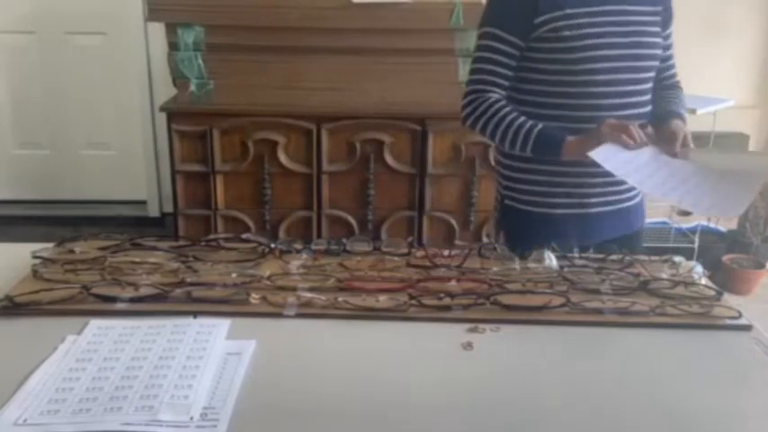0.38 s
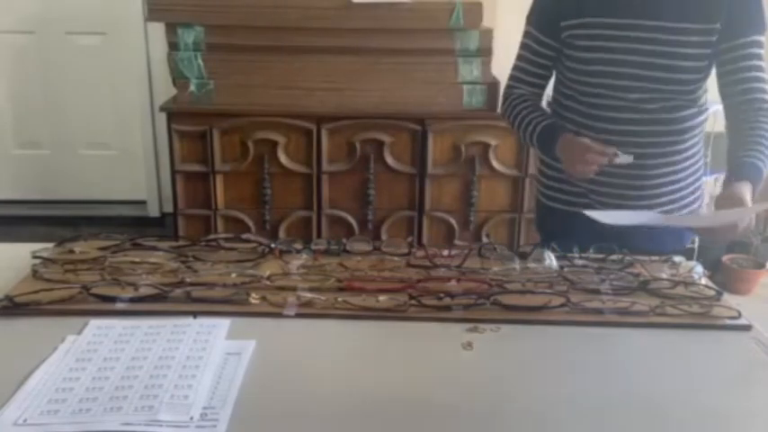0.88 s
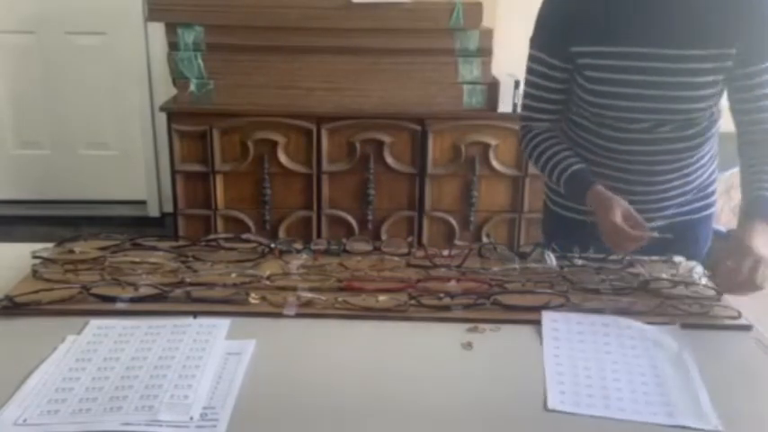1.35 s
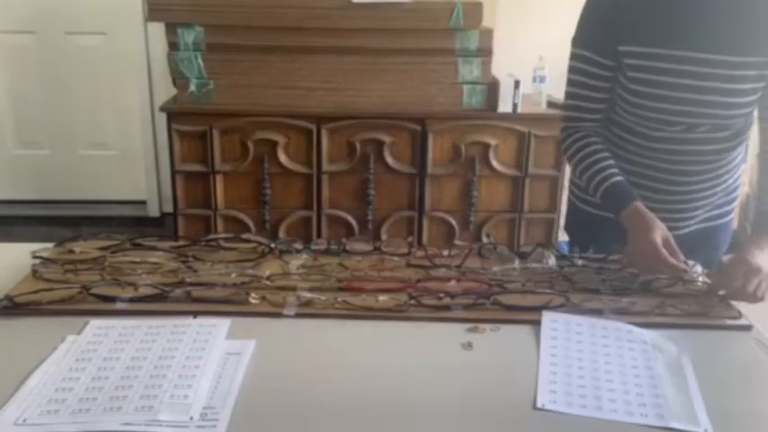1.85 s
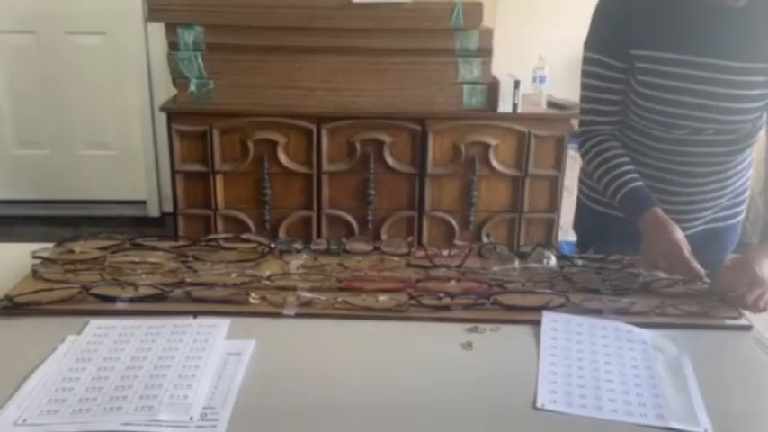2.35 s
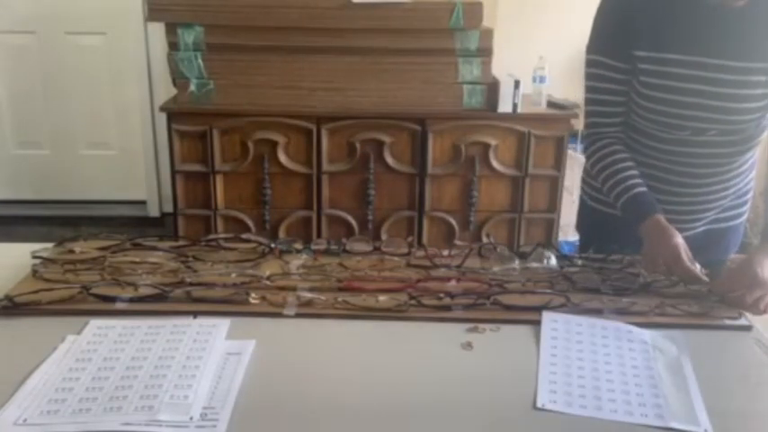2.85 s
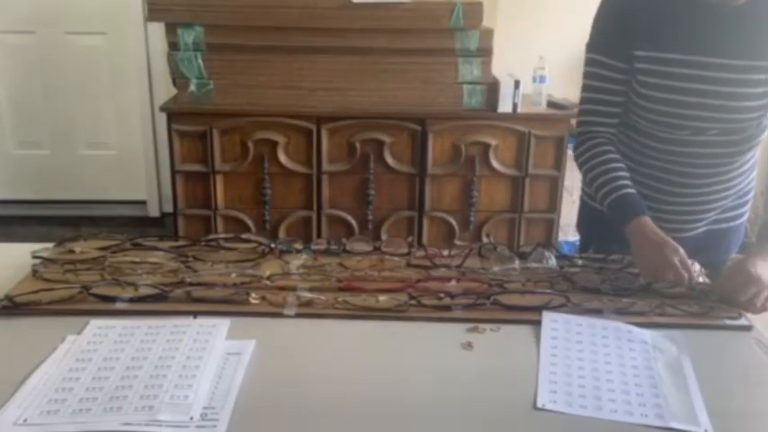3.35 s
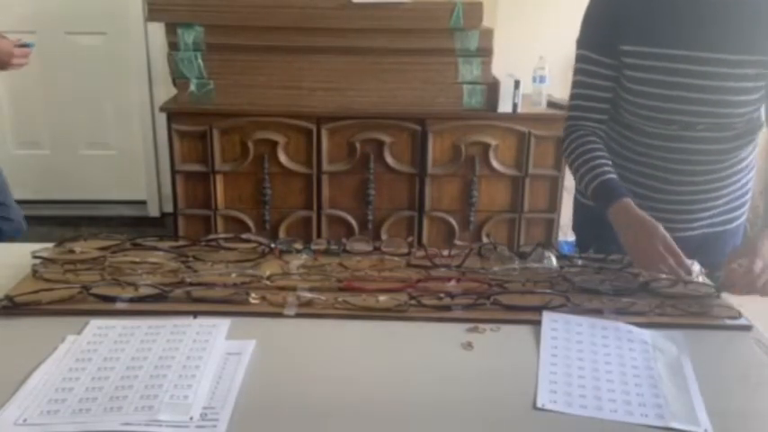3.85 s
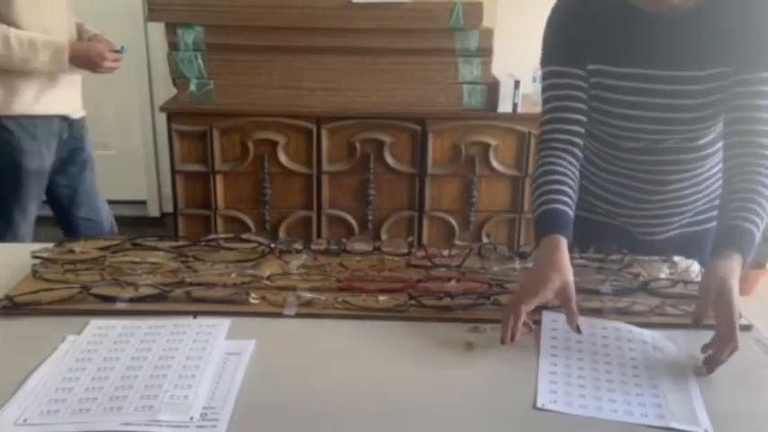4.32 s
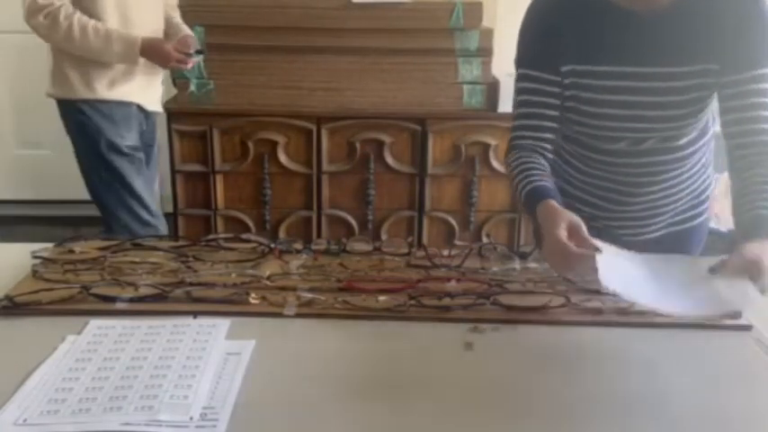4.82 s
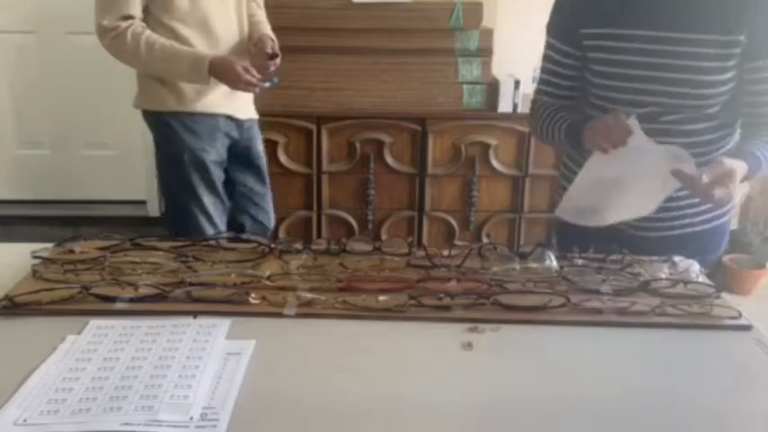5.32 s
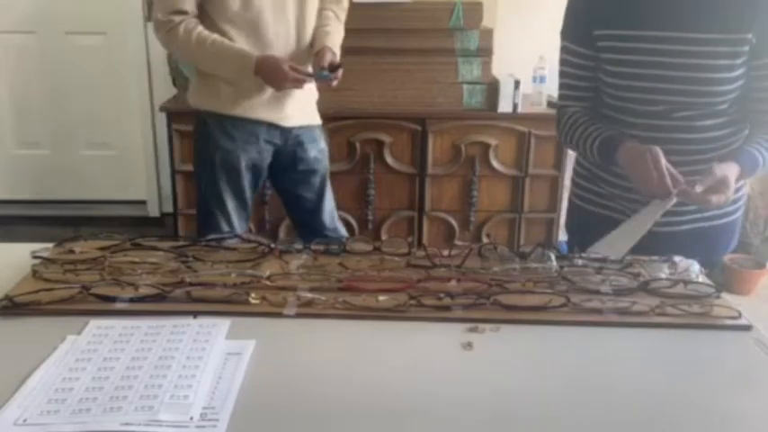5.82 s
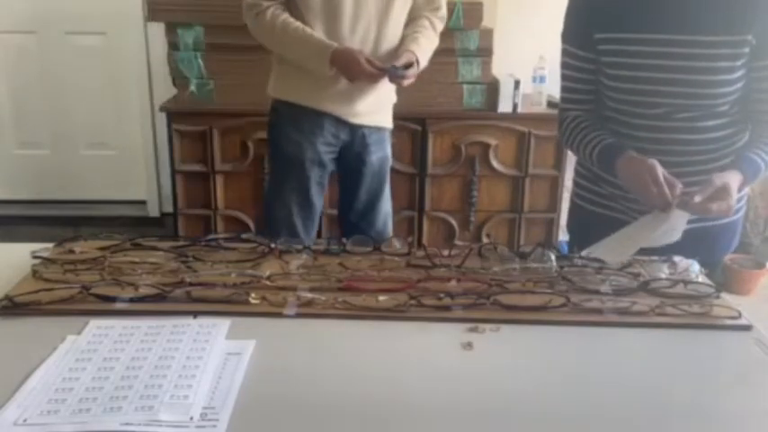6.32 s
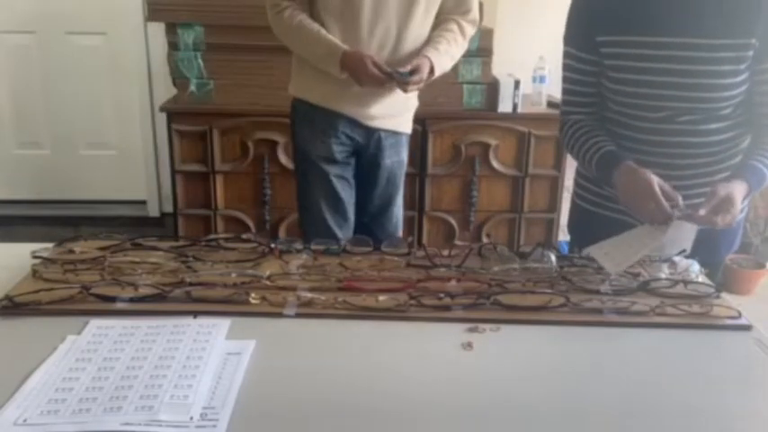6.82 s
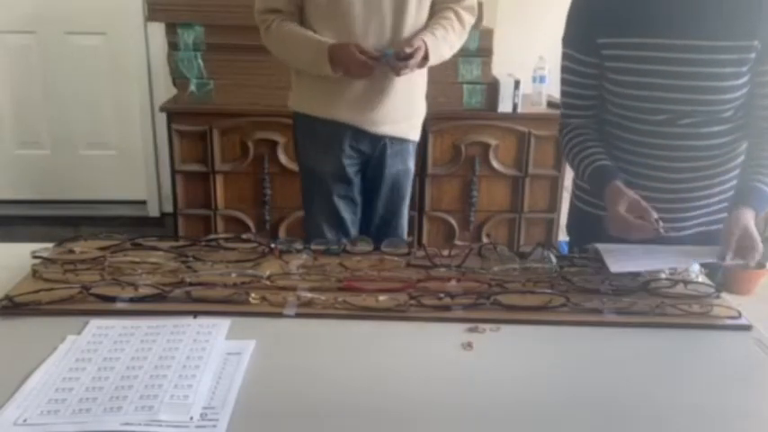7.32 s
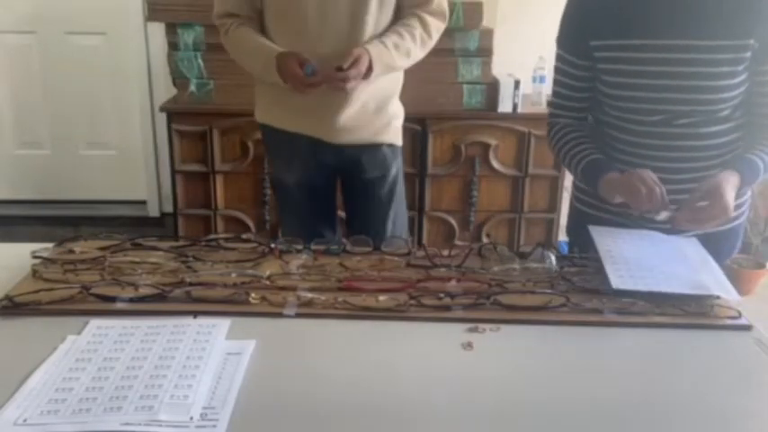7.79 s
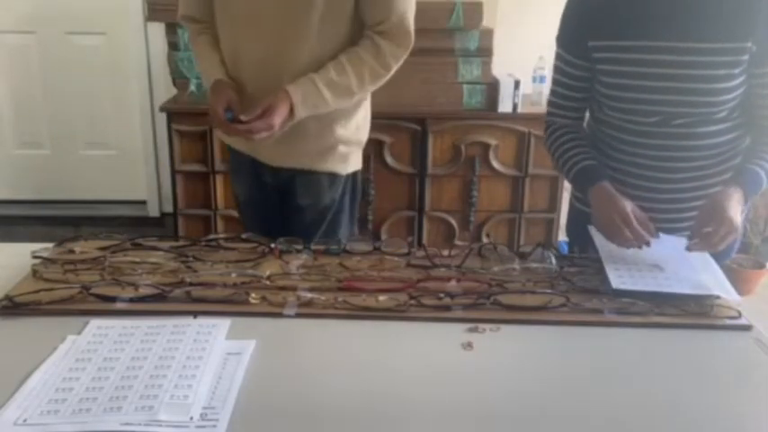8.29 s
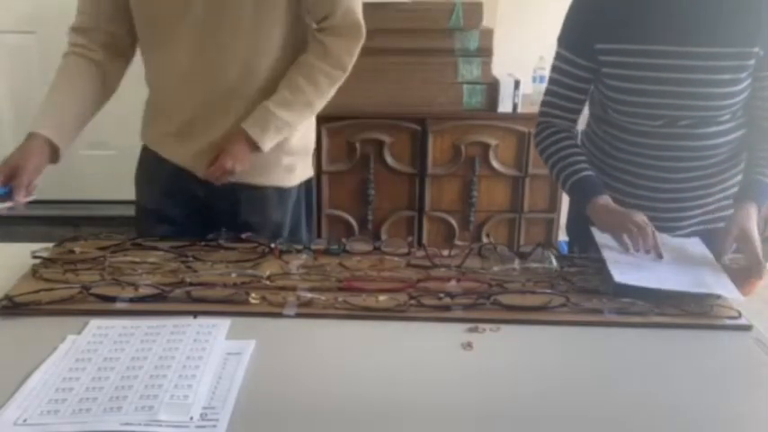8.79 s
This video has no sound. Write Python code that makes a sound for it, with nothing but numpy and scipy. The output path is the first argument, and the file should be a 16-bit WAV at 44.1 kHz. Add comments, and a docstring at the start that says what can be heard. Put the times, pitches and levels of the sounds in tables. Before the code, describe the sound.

A quiet furnished room with faint ventilation rumble and low mains hum, heard by a phone near a table. From 0 to 1.3 s paper rustles and slides, with light plastic taps, soft knocks and tiny crease pops. A very short, rough squeak of rubbing comes at about 1.35 s. From 1.5 to 3.8 s it is sparser: small ticks, a crisp click near 2.2, faint paper crackles. A bright sliding swish at 4.1 leads into the busiest moment, 4.25 to 4.7 s: hard clicks, table thuds, a brief loose-frame rattle and loud crinkling paper. Another paper crackle comes at 5.3. Distinct dry plastic clicks follow at about 5.7, 6.0, 6.3, 6.6 and 6.9, with gentle rustling between. From 7 to 8.2 s there is soft paper crackle and minor taps, then the sharpest snap at 8.5, a small tap, and fading rustle to about 8.9.

```python
"""Plastic spectacle frames tap and snap on a long table: each tap is a short burst shaped by damped modes.
Paper sheets rustle and slide by stick-slip friction and pop as creases buckle; knocks excite the table top.
A finger's rubbing gives a squeak of harmonics and jolts ring a loose frame's modes; a furnished room reflects.
Ventilation rumble, mains hum and a faint whine lie underneath as shaped noise and tones; a phone listens."""
import sys
import numpy as np
from scipy import signal
from scipy.fft import rfft, irfft
from scipy.io import wavfile
from scipy.ndimage import uniform_filter1d

SR = 44100
rng = np.random.default_rng(int(sys.argv[2]) if len(sys.argv) > 2 else 0)


def bounce(signal):
    """Save signal as a 16-bit WAV file at the path given by the first command-line argument."""
    frames = np.transpose(np.atleast_2d(signal))
    limited = np.clip(frames, -1, 1)
    pcm = np.round(limited * 32767).astype(np.int16)
    wavfile.write(sys.argv[1], SR, pcm)


def ratio_of_db(decibels):
    """Turn decibels (scalar or array-like) into linear amplitude factors; 0 dB maps to 1."""
    return 10 ** (np.asarray(decibels, float) / 20)


N = 393372
T = np.arange(N) / SR
TAP_T60 = .009  # s, nominal 60 dB decay of a tap's burst

# Table levels belong to the source, ahead of its fluctuation, the room and the stereo balance.
# hands and frames knock the table top: t/s, thud level/dB, rumble level/dB, time to die by 20 dB/s
# (a time below 5 ms counts as 5 ms)
KNOCKS = [(0.0, -80, -50.5, 0.56), (.192, -44.5, -55.5, 2.8), (.4788, -50, -51, 0.3),
          (.6547, -60, -58, 0.6), (.772, -53, -52.5, 0.6), (1.066, -47, -50.5, 0.17),
          (1.21, -67, -46, -0.1), (1.4925, -59, -52, 0.05), (1.56, -75, -52, 0.2),
          (1.89, -75.5, -61.5, 1.3), (2.25, -70, -62, 0.6), (2.575, -72, -51.5, 0.13),
          (2.9345, -57.5, -58.5, 0.7), (3.27, -70, -60, 1.1), (3.8401, -47, -40.5, 0.0651),
          (4.2675, -35.5, -30.5, 0.3), (4.3135, -44, -37, 0.23), (4.342, -55, -50, 0.1),
          (4.3801, -38.5, -37, .1), (4.41, -43, -36.5, 0.11), (4.4682, -44, -45, 0.06),
          (4.52, -45, -40, 0.18), (4.594, -45, -55, 0.1), (4.94, -55.5, -61, 4), (5.015, -60, -49.5, 0.16),
          (5.1114, -52, -62, 3), (5.2555, -46, -45, .08), (5.3105, -41, -46, 0.2), (5.485, -65, -44, -0.15),
          (5.6183, -54, -54.5, 0.7), (5.698, -43.5, -61.5, 1), (5.7884, -50, -67, .2),
          (5.9666, -42.5, -57, .2), (6.1178, -60, -68, 7), (6.27, -60, -56, 0.1), (6.323, -37, -55.5, .2),
          (6.556, -49.5, -55, 0.1), (6.6204, -46, -60.5, -1.5), (6.768, -59.5, -64, 2),
          (6.862, -41, -68.5, -0.3), (7.2566, -51, -57.5, .3), (7.4808, -48, -52.5, 0.2),
          (7.64, -65, -50, -0.6), (7.8412, -57.5, -51, 0.03), (8.19, -57, -57, 0.27),
          (8.4829, -65, -54, 0.16), (8.5891, -52, -49, 0.1), (8.86, -75, -63, 0.7)]


def on_log(table, hz):
    """Interpolation on a logarithmic frequency axis, the natural scale of pitch."""
    f, v = np.transpose(table)
    return np.interp(np.log(np.maximum(hz, 1)), np.log(f), v)


def level(x, db):
    """The rms value measures mean power: scale the signal to it."""
    return x * ratio_of_db(db) / np.sqrt(np.mean(x ** 2))


def colour(x, gain):
    """Linear filtering multiplies the spectrum by a gain that is a function of frequency."""
    size = x.shape[-1]
    return irfft(rfft(x) * gain(np.arange(size // 2 + 1) * SR / size), size)


def spread(mid, side):
    """Diffuse-field coherence: two close microphones hear partly alike signals, set by mid and side power."""
    # left-right likeness: f/Hz, correlation (0-1)
    likeness = [(60, 0.97), (130, 0.95), (250, 0.84), (450, 0.69), (800, 0.2), (1300, 0.28), (2400, 0.8),
                (4400, 0.45), (8000, 0.59), (15000, 0)]
    like = lambda hz: np.clip(on_log(likeness, hz), 0, 1)
    mid = colour(mid, lambda hz: np.sqrt((1 + like(hz)) / 2))
    side = colour(side, lambda hz: np.sqrt((1 - like(hz)) / 2))
    return np.array([mid + side, mid - side])


def walk(rate):
    """Band-limited random fluctuation: levels held 1 / rate s, slewed twice, with a spread near 1."""
    hold = int(SR / rate)
    steps = np.repeat(rng.standard_normal(N // hold + 1), hold)
    return 1.3 * uniform_filter1d(uniform_filter1d(steps, hold), hold)[:N]


def ring(hz, width, db):
    """Narrow-band noise: one resonance turns noise into a wavering tone, halved in amplitude at hz +- width."""
    return level(colour(rng.standard_normal(N), lambda f: 1 / (1 + ((f - hz) / width) ** 2)), db)


def swell(s, rise, fall):
    """Exponential growth and decay: power changes evenly in dB, by 20 dB in each given time (at least 5 ms)."""
    distance = np.where(T < s, (s - T) / max(rise, .005), (T - s) / max(fall, .005))
    return ratio_of_db(np.maximum(-40 * distance, -300))


def crackle(rate, scatter_db, hiss_db, smear_s):
    """Stick-slip: fibres slip in small uneven jerks, each smeared by a short tail, over a smooth hiss."""
    sizes = ratio_of_db(scatter_db * np.minimum(rng.exponential(size=N), 3.5))
    jerks = (rng.random(N) < rate / SR) * sizes
    power = signal.lfilter([1], [1, -np.exp(-1 / (smear_s * SR))], jerks ** 2)
    envelope = np.sqrt(power / power.mean() + ratio_of_db(2 * hiss_db))
    return spread(*envelope * rng.standard_normal((2, N)))


def crack(t60, chance):
    """High modal overlap: dense damped modes merge into a dying burst, a little different at each port."""
    # direct sound at the two microphone ports: f/Hz, left minus right level/dB
    port_db = [(60, 2), (1300, -5), (2400, 0), (4400, 5), (8100, 2), (15000, -8)]
    # f/Hz, phase by which left leads/rad
    port_rad = [(0, -1), (1460, 0.48), (3190, -0.4), (6290, 1.5), (7490, 2.5), (8700, -0.85), (9730, -2),
                (10900, -5.5), (11400, -5.5), (12700, 5), (13400, -11), (14100, -12), (14800, -8.5),
                (16700, -18)]
    t = T[:chance.shape[1]]
    envelope = (1 - np.exp(-t / 0.000433)) * np.exp(-np.log(1000) * t / t60)
    burst = (chance[0] + 0.418 * chance[1:]) * envelope  # a shared part and one of each port
    # partly flatten the chance spectrum
    even = colour(burst, lambda f: np.abs(rfft(burst.mean(axis=0)) + 1e-9) ** -0.62)
    port = lambda f: ratio_of_db(on_log(port_db, f) / 2) * np.exp(.5j * np.interp(f, *np.transpose(port_rad)))
    return np.array([colour(even[0], port), colour(even[1], lambda f: 1 / port(f))])


def register(source, shape, db):
    """Spectral weighting: one register of a blow, at an rms level over its first 10 ms."""
    x = colour(source, lambda f: ratio_of_db(on_log(shape, f)))
    return x * ratio_of_db(db) / np.sqrt(np.mean(x[:, :440] ** 2))


def strike(out, s, blow):
    """Superposition: lay one blow into the output, its filter pre-ring faded in."""
    lead = 256  # samples
    blow = np.roll(blow, lead, axis=1) * np.clip(np.arange(4096) / lead, 0, 1) ** 4
    start = int(s * SR)
    return np.pad(blow, ((0, 0), (start, N - start)))[:, lead:lead + N] + out


def background():
    """Steady sources: shaped ventilation noise, narrow-band hum and a thin sinusoidal whine that comes and goes."""
    # ventilation spectrum: f/Hz, relative level/dB
    air_shape = [(15, -36), (25, -6), (80, 7.5), (226, -7), (445, -15), (1030, -24), (2330, -30.5),
                 (4240, -43.5), (8600, -36), (9330, -58), (10100, -52), (11300, -62), (13600, -60),
                 (15200, -48), (16500, -63)]
    # mains hum: f/Hz, half-amplitude offset/Hz, level/dB
    hum_lines = [(60.1, 7.6, -59.5)]
    # second hum line wavers, and swells as the table is bumped near 4.3 s: t/s, level/dB
    buzz_levels = [(0, -65.5), (4, -65.5), (4.3, -63), (4.9, -73), (5.9, -57.5), (6.3, -73.5), (7, -57),
                   (7.9, -70), (8.3, -58), (8.92, -58.5)]
    # whine swells: start t/s, end t/s, level/dB
    whine_swells = [(3.08, 3.28, -77), (3.28, 3.5, -82), (3.6, 4.15, -83), (7.15, 7.4, -83)]
    air = colour(spread(*rng.standard_normal((2, N))), lambda f: ratio_of_db(on_log(air_shape, f)))
    air = level(air, -58) * ratio_of_db(0.21 * walk(2.74))
    hum = sum(ring(*line) for line in hum_lines)
    buzz = ring(121.8, 6.4, 0) * ratio_of_db(np.interp(T, *np.transpose(buzz_levels)))
    whine = np.sqrt(2) * np.sin(2 * np.pi * np.cumsum(1220 + 4 * walk(3.0)) / SR)  # near 1220 Hz
    fade_s, rest_db = 0.05, -92.5
    comes = sum(ratio_of_db(db) * np.clip(1 + np.minimum(T - a, b - T) / fade_s, 0, 1) for a, b, db in whine_swells)
    return air + hum + buzz + whine * (ratio_of_db(rest_db) + comes) * ratio_of_db(1.5 * walk(9))


def thuds():
    """Impact excitation: the low blow of each knock rings longer than a tap."""
    # low register: f/Hz, relative level/dB
    low_shape = [(180, -35), (400, 4.5), (900, 3.5), (1400, -27)]
    out = 0
    for (s, thud_db, _, _), chance in zip(KNOCKS, rng.standard_normal((len(KNOCKS), 3, 4096))):
        out = strike(out, s, register(crack(3.9 * TAP_T60, chance), low_shape, thud_db))
    return out


def table_rumble():
    """Modal resonance: the table top's broad modes colour uneven noise that swells with each knock."""
    # modes of the table top: f/Hz, half-power bandwidth/Hz, relative level/dB
    table_modes = [(75, 30, -1.5), (144, 76, 4), (267, 110, -3.5), (413, 112, 0.5), (714, 64, -5)]
    power = ratio_of_db(2 * -68)  # hands never rest
    for s, _, rumble_db, fall in KNOCKS:
        power = power + ratio_of_db(2 * rumble_db) * swell(s, .005, fall)

    def wood(f):
        """Incoherent modes add in power; the bass is cut around 60 Hz."""
        modes = sum(ratio_of_db(2 * db) / (1 + (2 * (f - hz) / w) ** 2) for hz, w, db in table_modes)
        return np.sqrt(modes) * f ** 2 / (f ** 2 + 60 ** 2)

    return level(colour(crackle(70, 4.0, -5.9, 0.023), wood), 0) * np.sqrt(power)


def paper():
    """Friction and buckling: sheets flex and crackle, slide with a brighter noise, and their creases pop."""
    # sheets are moved: loudest t/s, time to swell by 20 dB/s, time to die by 20 dB/s,
    # flexing level/dB, sliding level/dB (a time below 5 ms counts as 5 ms)
    rustles = [(0.0, .1, 0.2, -55, -57.5), (.21, 0.1, 0.43, -56.5, -55), (.27, -0.1, 0.15, -65, -60),
               (.52, 0.46, 0.47, -55, -51.5), (0.838, 0, 0.26, -52.5, -51.5), (1.19, 0.3, 0.17, -60.5, -67),
               (1.29, 0.13, 0.13, -58.5, -53), (1.35, 0.04, 0.08, -56, -55), (1.57, 0.16, 0.04, -73, -64.5),
               (1.81, 0, 0.1, -75, -64), (2.04, 1, 0.24, -68.5, -78), (2.26, -0.09, 0.2, -64.5, -54.5),
               (2.58, 0.06, -0.1, -61.5, -70.5), (2.95, 0.1, .3, -69, -66.5),
               (3.29, 0.07, .5, -64.5, -65.5), (3.8, 0.09, .1, -75, -58.5), (4.057, 0.03, 0.24, -64, -45),
               (4.088, -0.0269, 0.09, -66, -41), (4.28, -0.17, 0.63, -74, -82),
               (4.375, 0.0558, 0.11, -42, -48.5), (4.51, -0.03, 0.17, -46, -47),
               (4.6, 0.01, 0.42, -53.5, -57.5), (4.72, 0.6, -0.27, -49.5, -65),
               (5.018, 0.05, 0.16, -56.5, -60.5), (5.191, 0.1, 0.25, -59, -59),
               (5.32, 0.06, 0.14, -41, -49), (5.48, -0.2, 0.1, -56, -78), (5.53, 0, 0.4, -64.5, -62.5),
               (5.575, 0, .1, -64, -60.5), (5.71, 0.07, 0.04, -56, -52), (5.84, -1.1, -0.16, -85, -56),
               (5.96, 0.1, 0.13, -53.5, -60.5), (5.99, -0.01, -0.05, -67, -41.5),
               (6.351, 0.3, -0.44, -54, -61), (6.562, 0.3, -0.04, -61, -70), (6.65, 0.28, .15, -66, -59),
               (6.83, 0.04, -0.46, -54, -65), (6.9, .04, 0.01, -62, -52), (7.22, 0.8, 0.2, -66.5, -68.5),
               (7.28, 0.86, 0.17, -59.5, -67.5), (7.43, 0.1, -0.04, -61, -82),
               (7.49, 0.12, 0.16, -52, -65.5), (7.85, .1, -0.2, -66, -61), (8.189, 0.1, 0.15, -56, -59),
               (8.5, 0.06, 0.4, -59.5, -75), (8.6, 0.1, 0.06, -53, -69), (8.668, 0.2, 0.16, -60.5, -82.5)]
    # flexing spectrum: f/Hz, relative level/dB
    flex_shape = [(600, 1.5), (1000, 8), (1600, 4.5), (2400, 3.5), (3400, -2.5), (4500, -17), (7000, -30)]
    # sliding noise as heard, thin near 10.2 and 13.5 kHz: f/Hz, relative level/dB
    slide_shape = [(2500, -5), (4000, -2), (5500, 2.5), (8000, 2.5), (9500, -0.5), (10200, -21),
                   (11500, -0.5), (13500, -18), (15200, 3), (16500, -12)]
    flex_power, slide_power = ratio_of_db(2 * -77), ratio_of_db(2 * -86)  # hands never rest
    for s, rise, fall, flex_db, slide_db in rustles:
        power = swell(s, rise, fall)
        flex_power = flex_power + ratio_of_db(2 * flex_db) * power
        slide_power = slide_power + ratio_of_db(2 * slide_db) * power
    flex = level(colour(crackle(140, 2.4, -8.5, 0.0089), lambda f: ratio_of_db(on_log(flex_shape, f))), 0)
    slide = level(colour(crackle(340, 6.3, -1.5, 0.0048), lambda f: ratio_of_db(on_log(slide_shape, f))), 0)
    creases = room(np.tile(pops(np.sqrt(flex_power + slide_power)), (2, 1)))
    return creases + flex * np.sqrt(flex_power) + slide * np.sqrt(slide_power)


def pops(rustle):
    """Snap-through buckling: creases click as decaying sines, lone ones and a chance crowd led by the rustle."""
    # lone creases: t/s, level ahead of the decay/dB, f/Hz
    lone_pops = [(0.2344, -51, 1930), (0.3027, -41, 7210), (0.4244, -42, 1440), (0.4628, -27, 8200),
                 (0.5794, -29.5, 8900), (0.7144, -39.5, 2130), (1.2211, -50, 1940), (1.4694, -57, 2010),
                 (1.4844, -45, 2160), (3.0485, -45.5, 3110), (3.0634, -50, 1760), (3.2261, -49.5, 1530),
                 (3.276, -46, 2430), (3.3273, -47, 2270), (3.3444, -52, 1240), (3.6795, -43, 8760),
                 (3.709, -42, 7650), (3.7703, -42, 7630), (3.7934, -32, 8290), (4.3006, -42, 3490),
                 (4.3914, -31, 3480), (7.2075, -44, 2220), (7.2744, -44, 1570), (7.3044, -39, 1200),
                 (7.4215, -49, 2520), (7.4714, -41, 1390), (7.5408, -54.5, 1530), (7.5864, -60, 1420),
                 (7.6374, -52, 1840), (7.7294, -76.5, 1240), (8.2536, -53, 2350)]
    rate, top_db, low_hz, high_hz = 99, 7, 1200, 9100  # chance pops: per s, most dB over the rustle, range
    when, pitch, size = rng.random((int(rate * N / SR), 3)).T
    s, db, hz = np.transpose(lone_pops)
    at = np.append(s * SR, when * N).astype(int)
    hz = np.append(hz, low_hz * (high_hz / low_hz) ** pitch)[:, None]
    gain = np.append(ratio_of_db(db), rustle[at[len(s):]] * ratio_of_db(top_db - 21 * size))[:, None]
    t = T[:512]
    attack = np.minimum(t * hz / 1.5, 1)  # one and a half cycles
    decay = np.exp(-np.log(1000) * t * hz / 15)  # 60 dB in 15 cycles
    clicks = gain * attack * np.sin(2 * np.pi * hz * t) * decay
    out = np.zeros(N + 512)
    np.add.at(out, at[:, None] + np.arange(512), clicks)
    return out[:N]


def taps():
    """Impact spectrum: every tap rings the frame's body and snaps above it, crisper the harder the edge."""
    # t/s, frame body level/dB, body resonance f/Hz, snap peak level/dB,
    # crispness (top register over the snap)/dB
    tap_table = [(.0473, -48.5, 1810, -44, -32), (0.129, -73.5, 2000, -63, 1), (.161, -66, 1590, -51.5, -5),
                 (0.193, -42, 1620, -41, -39), (.4137, -52.5, 1420, -69, 13.5),
                 (0.4786, -50.5, 2040, -63, 13), (0.6546, -54, 1770, -36.5, -14),
                 (.772, -46.5, 1250, -67, -13), (0.9346, -71, 1390, -41, -15),
                 (0.9505, -78, 1660, -40, -12), (.9918, -62, 1130, -48, -21),
                 (1.065, -60.5, 2150, -57, -28), (1.1622, -60, 2060, -48, -37),
                 (1.277, -78.5, 3100, -43, -30), (1.4923, -64, 2180, -52.5, -5.5),
                 (1.5542, -56, 2550, -53, -8), (1.595, -84, 2530, -59.5, 4), (1.611, -82, 2470, -59, 6),
                 (1.6325, -68, 1940, -52, 5.5), (1.7702, -69, 2340, -60.5, 2),
                 (1.929, -51.5, 2640, -45.5, 0.5), (2.223, -59, 3200, -30, -15),
                 (2.2506, -64, 3200, -37, -9), (2.4248, -66.5, 3080, -46.5, -12.5),
                 (2.9348, -50.5, 2040, -54.5, -1), (2.9509, -57, 2010, -43.5, -3),
                 (3.661, -85, 2400, -62.5, -1), (3.7318, -61, 2430, -53.5, -5.5),
                 (3.8202, -55, 1740, -51, -7), (3.8399, -48, 2350, -37.5, -13.5),
                 (4.2673, -67, 1220, -25.5, -27), (4.3133, -63, 1210, -37, -16),
                 (4.3802, -60, 1640, -34, -12), (4.4679, -45.5, 1290, -32.5, -21),
                 (4.594, -32.5, 1940, -24, -22), (4.6116, -38, 1320, -44, -17.5),
                 (4.6882, -50, 1810, -48, -18), (4.94, -51.5, 1300, -51.5, -13),
                 (5.0821, -54.5, 1800, -68, -23), (5.1123, -54, 1910, -60, -23),
                 (5.255, -37, 1660, -63, -13), (5.3114, -64, 1220, -53, -3.5),
                 (5.6183, -54.5, 1270, -64, 3), (5.698, -34, 1290, -29.5, -7.5),
                 (5.7886, -49.5, 1900, -40.5, 2.5), (5.9671, -36.5, 1610, -32.5, -7.5),
                 (6.1186, -56, 1640, -49.5, -21), (6.323, -35.5, 1630, -37.5, 1),
                 (6.555, -60, 1850, -68, 12.5), (6.6206, -42, 1630, -41, -3),
                 (6.768, -59.5, 1180, -73.5, 6), (6.862, -39.5, 1940, -34.5, -7),
                 (7.124, -76, 2000, -62, -6), (7.2569, -53, 1460, -56, -30), (7.4809, -50, 1180, -59, -5),
                 (7.8198, -57, 3100, -38, -14), (7.8415, -51, 2120, -37.5, -11),
                 (8.056, -66, 1910, -65.5, -7), (8.393, -61.5, 1900, -54.5, -37),
                 (8.4835, -34, 2050, -20, -17.5), (8.5895, -55, 1420, -53, -12.5)]
    # spectra of the body, snap and top registers (the top as heard, thin near 10.2 and 13.5 kHz): f/Hz,
    # relative level/dB
    mid_shape = [(800, -10), (1300, 2.5), (2600, 3), (3700, -19), (6000, -55)]
    upper_shape = [(2400, -16), (3300, 1), (5000, -5.5), (6400, -22)]
    top_shape = [(4600, -26.5), (6200, -4), (9000, -3), (10200, -12.5), (11500, -8.5), (13500, -31),
                 (15200, -10), (16500, -21)]
    lift_db, width = 12, 0.52  # resonance: its lift, its width as a share of its pitch
    chances = rng.standard_normal((len(tap_table), 3, 4096))
    out = 0
    for (s, body_db, body_hz, snap_db, crisp_db), chance in zip(tap_table, chances):
        short = crack(TAP_T60, chance)
        body = colour(short, lambda f: ratio_of_db(lift_db / (1 + (2 * (f / body_hz - 1) / width) ** 2)))
        snap = colour(short, lambda f: ratio_of_db(on_log(upper_shape, f)))
        snap = snap * ratio_of_db(snap_db) / np.abs(snap.mean(axis=0)).max()
        body = register(body, mid_shape, body_db)
        top = register(short, top_shape, snap_db + crisp_db)
        out = strike(out, s, snap + body + top)
    return out


def squeak():
    """Friction oscillation: a finger rubs a rough sagging tone whose overtones grow as it settles."""
    # start t/s, end t/s, initial f/Hz, settled f/Hz, glide time constant/s
    rub = (1.322, 1.395, 1800, 1550, .03)
    # harmonics: multiple of the fundamental, level/dB
    orders = [(1, -58), (2, -68), (3, -68), (4, -70)]
    start, end, high_hz, low_hz, glide = rub
    settled = 1 - np.exp(-np.maximum(T - start, 0) / glide)
    pitch = (high_hz + (low_hz - high_hz) * settled) * (1 + 0.068 * walk(700))
    phase = 2 * np.pi * np.cumsum(pitch) / SR
    out = sum(np.sqrt(2) * ratio_of_db(db) * settled ** (k - 1) * np.sin(k * phase) for k, db in orders)
    fade = np.clip(np.minimum(T - start, end - T) / .008, 0, 1)
    return out * ratio_of_db(5 * walk(90)) * fade


def rattle():
    """Impulse response: a loose frame chatters when the table is bumped, each jolt ringing the same few modes."""
    # jolts: t/s, strength level/dB
    jolt_table = [(4.2667, -32.5), (4.284, -56), (4.301, -44), (4.3132, -40), (4.3801, -32.5), (4.393, -49),
                  (4.41, -52), (4.426, -43), (4.515, -46)]
    # modes of the frame: f/Hz, level/dB, 60 dB decay time/s
    frame_modes = [(3360, -16, 0.039), (3620, -1.5, 0.028), (1645, -10, 0.057)]
    jolts = np.zeros(N)
    for s, db in jolt_table:
        jolts[int(s * SR)] = ratio_of_db(db)
    t = T[:8192]
    modes = sum(ratio_of_db(db) * np.sin(2 * np.pi * hz * t) * np.exp(-np.log(1000) * t / t60)
                for hz, db, t60 in frame_modes)
    return signal.fftconvolve(jolts, modes)[:N]


def room(dry):
    """Reverberation: a few early echoes and a dense tail with a decay time for each octave band."""
    # reverberation time: f/Hz, 60 dB decay time/s
    decay_times = [(300, 0.16), (1200, 0.43), (3000, 0.27), (6000, 0.49), (12000, 0.053)]
    # nearest surfaces: t/s, level/dB
    early = [(.0065, -11), (0.01, -14)]
    size = SR // 2
    t = T[:size]
    tail, noise = 0, spread(*rng.standard_normal((2, size)))
    for hz in 125 * 2. ** np.arange(8):
        # overlapping octave bands whose gains sum to one
        octaves = lambda f: np.clip(np.log2(np.maximum(f, 1) / hz), -1, 1)
        band = colour(noise, lambda f: np.cos(np.pi / 2 * octaves(f)) ** 2)
        tail = tail + band * np.exp(-np.log(1000) * t / on_log(decay_times, hz))
    tail = tail * np.clip((t - .002) / 0.001, 0, 1)
    tail = tail * ratio_of_db(-3.5) / np.sqrt(np.mean(np.sum(tail ** 2, axis=1)))  # energy against the direct sound
    for s, db in early:
        tail[:, int(s * SR)] += ratio_of_db(db)
    return dry + signal.fftconvolve(dry.mean(axis=0)[None], tail, axes=1)[:, :N]


def scene():
    """Superposition: blows and squeak through the room, plus handling, balanced left-right over the background."""
    # place of the hands: t/s, left minus right level/dB
    hands_pan = [(0, 1.5), (1, 2), (2, 1.5), (2.7, 2), (3.5, 1.5), (4.9, 1), (6.8, .7), (7.7, 2.5),
                 (8.92, 3.5)]
    pan_db = np.interp(T, *np.transpose(hands_pan))
    in_room = room(taps() + thuds() + rattle() + squeak())
    hands = in_room + table_rumble() + paper()
    return hands * ratio_of_db(np.array([pan_db, -pan_db]) / 2) + background()


def top_cut(x):
    """Nothing passes above the cut-off."""
    return signal.sosfilt(signal.butter(12, 17140, fs=SR, output="sos"), x)


def record(dry):
    """Band limitation: the phone cuts the very top with a steep elliptic low-pass at 16 kHz."""
    low_pass = signal.ellip(8, .2, 70, 16000, fs=SR, output="sos")
    mix = signal.sosfilt(low_pass, dry)
    return top_cut(mix)


dry = scene()
out = record(dry)
bounce(out)
```